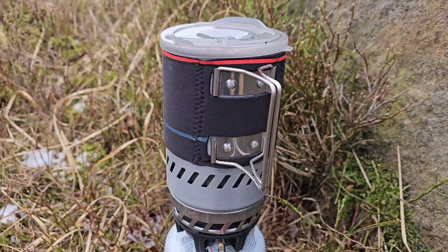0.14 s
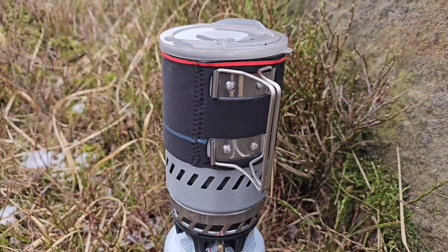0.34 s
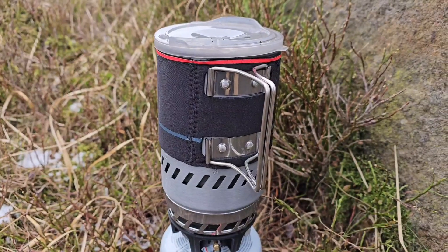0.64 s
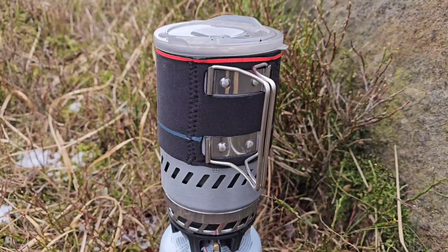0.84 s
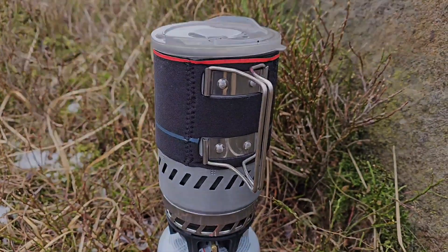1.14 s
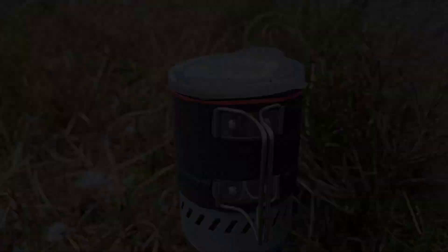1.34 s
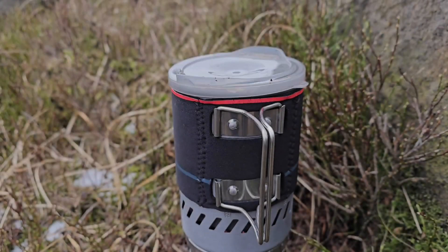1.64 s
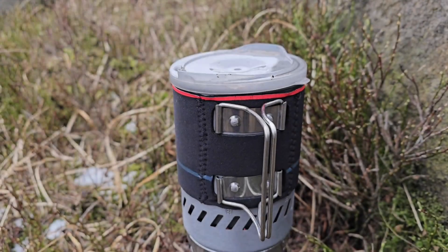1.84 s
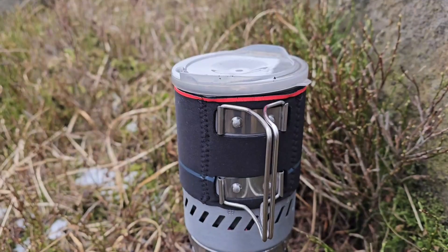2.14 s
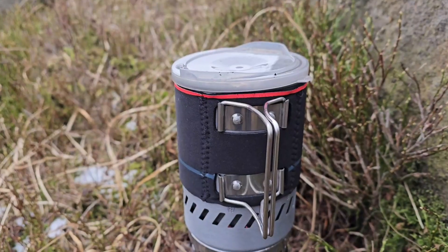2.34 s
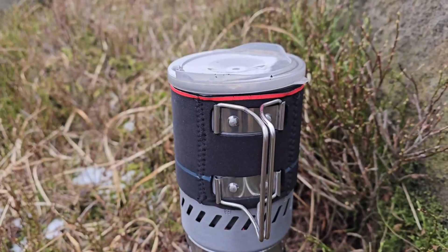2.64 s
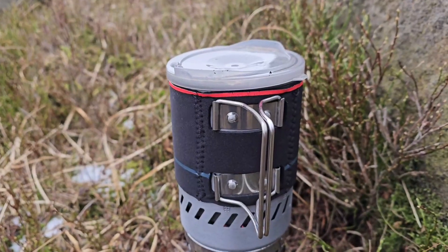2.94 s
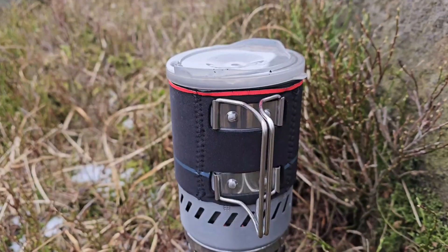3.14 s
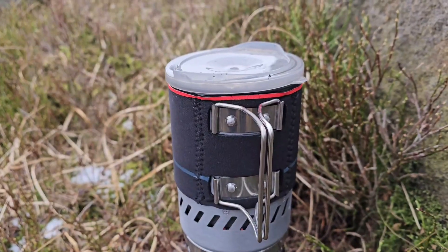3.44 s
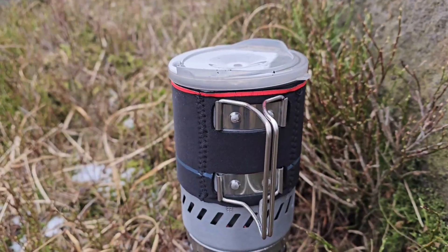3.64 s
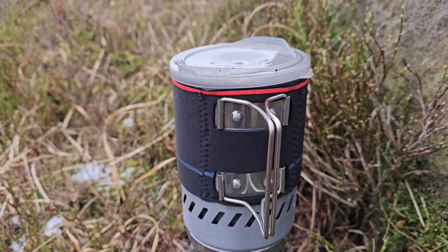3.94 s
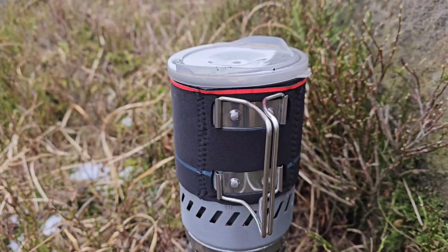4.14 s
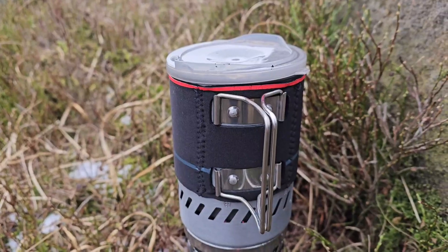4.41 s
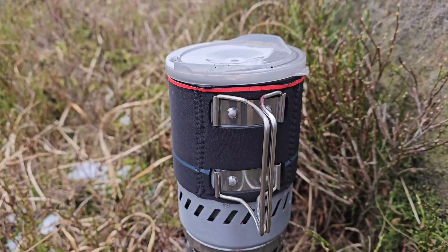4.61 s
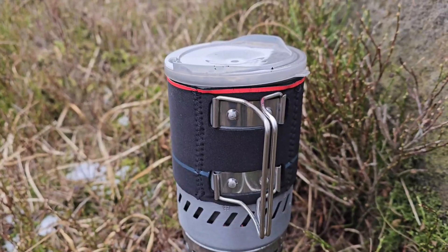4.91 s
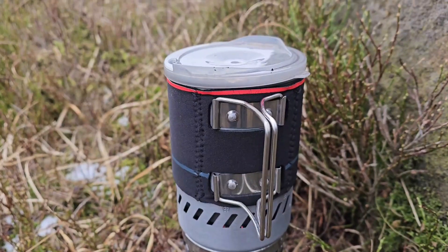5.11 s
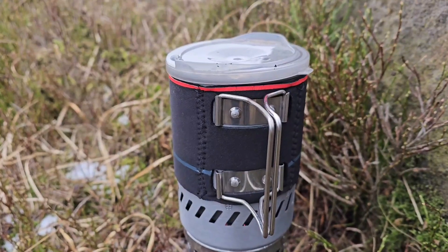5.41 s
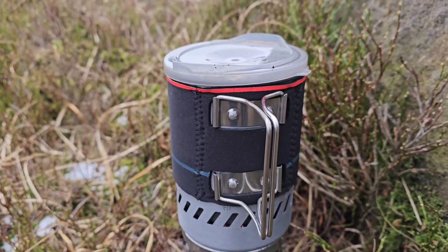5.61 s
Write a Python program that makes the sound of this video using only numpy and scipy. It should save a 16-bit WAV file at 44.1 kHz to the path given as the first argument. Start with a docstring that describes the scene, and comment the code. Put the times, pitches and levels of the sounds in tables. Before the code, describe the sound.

A canister gas stove burns beneath a lidded pot in open, grassy country. From 0 to 1.5 s it is heard a step away: a soft, steady broadband hiss with a hollow, slightly wavering roar near 500 Hz, partly covered by low wind rumble and short pressure thumps on the microphone, the hardest at about 1.2 s. Around 1.55 s the sound cuts to silence for a few hundredths of a second, then returns close up: the hiss is much louder, brighter and grainier, the roar fuller and more tonal, its level and pitch fluttering quickly in the breeze. Wind stays lighter until about 3 s, then buffets in deep, uneven gusts, strongest from roughly 3.5 to 4.8 s, moving between left and right. After 5 s it eases, leaving the burner exposed; a faint bright metal tick comes at 5.36 s and a duller one at 5.46 s. The hiss continues to the end, without echo.

```python
"""A canister gas stove heats a lidded pot on an open hillside, heard a step away, then, after a short break, close up.
The gas jet hisses as shaped broadband noise and excites resonances in the hollows of the burner and the pot's skirt.
The flame roars in the first of these resonances; its level and pitch flutter as the breeze fans it.
Wind on the microphone is low-frequency turbulence with single pressure swings; hot metal ticks as decaying
modes near the end."""
import sys
import numpy as np
from scipy import signal
from scipy.fft import irfft, next_fast_len
from scipy.io import wavfile
from scipy.ndimage import uniform_filter1d

SR = 44100
rng = np.random.default_rng(int(sys.argv[2]) if len(sys.argv) > 2 else 0)


def store_pcm(level_fs):
    """Save levels as 16-bit WAV."""
    pcm = np.round(np.clip(level_fs, -1, 1) * 32767).astype(np.int16)
    wavfile.write(sys.argv[1], SR, np.atleast_2d(pcm).T)


N = 254456
SIZE = 2 * next_fast_len(N // 2, True)
TIME = np.arange(N) / SR
HZ = np.maximum(np.arange(SIZE // 2 + 1) * SR / SIZE, 1)
SIDES = np.array([[1], [-1]])  # left, right


def from_db(db):
    """Amplitude gain is ten to the power of a twentieth of the decibels."""
    return 10 ** (np.asarray(db) / 20)


def in_pitch(rows):
    """Spectral envelopes are interpolated along logarithmic frequency, one per column after the first."""
    hz, *columns = np.transpose(rows)
    return [np.interp(np.log(HZ), np.log(hz), column) for column in columns]


def pan(db):
    """A level difference is split evenly between the sides; positive favours the left."""
    return from_db(SIDES * db / 2)


def white():
    """White noise has independent Gaussian spectral bins of equal power, here 0 dB per Hz."""
    return rng.standard_normal(2 * len(HZ)).view(complex) * np.sqrt(SIZE * SR) / 2


def wave(spectrum):
    """Inverse Fourier synthesis turns a spectrum into samples."""
    return irfft(spectrum, SIZE)[..., :N]


def drift(rate):
    """Twice low-passed noise wanders slowly; its spread is 1 and its rate is the corner in Hz."""
    step = 40  # samples between random draws
    r = np.exp(-2 * np.pi * rate * step / SR)
    draws = rng.standard_normal(2 * N // step)
    slow = signal.lfilter([1], [1, -2 * r, r * r], draws)[-(N // step + 2):]  # settled part
    slow = (slow - slow.mean()) / slow.std()
    return np.interp(np.arange(N) / step, np.arange(len(slow)), slow)


def evened(x, span_s):
    """Division by the short-term rms holds the level near 1, so that only quick lumps remain."""
    power = uniform_filter1d(np.mean(x ** 2, axis=0), max(int(span_s * SR), 3))
    power = uniform_filter1d(power, max(int(span_s * SR / 2), 3))
    return x / np.sqrt(power + 1e-20)


def bumps(rows):
    """Brief level changes in dB add as Gaussian pulses in time."""
    return sum(change_db * np.exp(-((TIME - s) / length_s) ** 2) for s, length_s, change_db in rows)


def gusts():
    """Incoherent addition: the gusts add their power to the breeze; returns rumble and flutter per port in dB."""
    # Each row: start in seconds, hold in seconds, deep rumble in dB and flutter in dB before the
    # growth, left-right difference in dB.
    gust_rows = [(0.065, 0.084, -44.5, -47.5, -5.5), (0.32, 0.26, -48, -45.5, -11),
                 (0.678, .13, -39, -44, -11), (0.932, 0.13, -41.5, -38.5, -4),
                 (1.181, 0.17, -40, -39.5, 3.5), (1.473, 0.073, -49, -42.5, 1),
                 (1.59, 0.072, -51, -40.5, -9.5), (1.715, 0.087, -57, -44, -7),
                 (1.97, 0.13, -45, -46.5, -7), (2.163, 0.11, -57, -45, -10), (2.342, .3, -46, -43, -10.5),
                 (2.70, 0.055, -40.5, -42.5, -11), (3.002, 0.047, -59, -36.5, -4),
                 (3.18, 0.09, -42, -35.5, 0), (3.365, 0.16, -39.5, -39.5, -1),
                 (3.612, 0.094, -33.5, -35, 0), (3.803, .1, -33.5, -37, 0.5), (4.06, 0.23, -55, -41, -3),
                 (4.373, 0.065, -39.5, -36, 0), (4.555, 0.15, -33.5, -34, 0), (4.764, 0.11, -49, -38, -4.5),
                 (5.056, 0.2, -53, -42.5, 0), (5.368, 0.35, -48, -47, -1)]
    breeze_rumble_db, breeze_flutter_db, breeze_pan_db = -47.5, -49.5, -1.5
    attack_s, release_s, growth_db = 0.054, 0.056, 1.0  # growth over the hold
    breeze = from_db([[[breeze_rumble_db]], [[breeze_flutter_db]]]) * pan(breeze_pan_db)
    power = breeze ** 2
    for start, hold_s, rumble_db, flutter_db, pan_db in gust_rows:
        age = TIME - start
        outside = np.maximum(-age, 0) / attack_s + np.maximum(age - hold_s, 0) / release_s
        growth = from_db(growth_db * (np.clip(age / hold_s, 0, 1) - 1.5))
        swell = np.exp(-np.minimum(outside, 10) ** 2) * growth
        power = power + (from_db([[[rumble_db]], [[flutter_db]]]) * pan(pan_db) * swell) ** 2
    return 10 * np.log10(power)


def lulls():
    """Amplitude modulation: the gain of the wind mostly sinks, once rises, for a moment."""
    # Each row: centre in seconds, length in seconds, change in dB.
    lull_rows = [(0.863, 0.02, 3), (1.09, .02, -2.5), (1.428, .025, -3.5), (1.872, .042, -4),
                 (3.156, .02, -1.5), (4.02, 0.028, -1.5), (4.994, .025, -1)]
    return from_db(bumps(lull_rows))


def turbulence(colour, own_db, lumpy_db):
    """Partial coherence: pressure noise shared by both ports, plus lumps on each port alone; rms near 1."""
    gain = from_db(in_pitch(colour)[0])
    shared = wave(white() * gain)
    own = [wave(white() * gain) * from_db(own_db + lumpy_db * drift(rate=9.9)) for port in SIDES]
    return evened(shared + np.array(own), span_s=0.44)


def eddies(cycles):
    """A convected eddy swings the pressure to and fro a couple of times, at one port before the other."""
    # Each row: time in seconds, peak in dB, swing in Hz, left-right difference in dB, left lead in radians.
    eddy_rows = [(0.012, -30.5, 72, -1, -1), (0.686, -32, 65.5, 0, -1.5), (0.734, -31.5, 80, -7, 1),
                 (0.791, -36, 86, -1, -1.5), (1.052, -33, 130, 1, .2), (1.127, -30.5, 62, 2, 0.5),
                 (1.188, -18.5, 111, -4, 1.5), (1.242, -28, 186, 3, -0.5), (1.324, -26.5, 149, -10, 2),
                 (1.584, -29.5, 60, -9, 1), (1.606, -29, 200, -6, 1), (1.953, -38, 60, -4, 0),
                 (2.05, -32, 48, 0, 0), (2.26, -29.5, 109, -7, 0), (2.44, -27.5, 178, -7, 0.7),
                 (2.736, -28.5, 62.5, -9, 0.9), (3.042, -33, 159, -2, -0.5), (3.285, -29, 80, 6, -1),
                 (3.41, -35, 89, 0, 3.5), (3.562, -25, 62, 3, 0.4), (3.624, -25, 71.6, 6, -1),
                 (3.657, -34, 93, 6, 0), (3.706, -34, 127, 3, -7), (3.798, -26, 95, 4, -1),
                 (3.883, -24.5, 70.5, 4, 0.8), (3.918, -27, 100, 0, 2), (4.207, -33, 106, -5, 0.5),
                 (4.446, -24.5, 165, 2, 0.13), (4.509, -24.5, 61, 9, 1), (4.597, -24.5, 78, 7, 0.2),
                 (4.653, -35, 108, 3, 0.4), (4.718, -24, 132, 12, 0.7), (4.739, -26.5, 80, 9, 1.5),
                 (5.043, -36, 70, 0, 0)]
    out = np.zeros((2, N))
    for (s, peak_db, hz, pan_db, lead), turn in zip(eddy_rows, rng.random(len(eddy_rows))):
        near = np.abs(TIME - s) < .1
        age = (TIME[near] - s) * hz  # in cycles
        swing = np.exp(-(age / cycles) ** 2) * np.cos(2 * np.pi * (age + turn) + SIDES * lead / 2)
        out[:, near] += from_db(peak_db) * pan(pan_db) * swing
    return out


def wind(rumble_db, flutter_db):
    """Eddy size sets frequency: large ones rumble, small ones flutter, the strongest thump on their own."""
    # Colours before levelling. Each row: frequency in Hz, relative level in dB per Hz.
    rumble_colour = [(14, -38), (23, -11), (33, 0.5), (58, 0), (85, -2), (120, -6.5), (160, -10.5),
                     (300, -72)]
    flutter_colour = [(90, -6.5), (135, 1), (170, 2.5), (215, 0.5), (262, 1), (315, -11), (370, -8.5),
                      (430, -18.5), (600, -16.5), (1500, -58.5)]
    rumble = from_db(rumble_db) * turbulence(rumble_colour, own_db=-7.5, lumpy_db=4.0)
    flutter = from_db(flutter_db) * turbulence(flutter_colour, own_db=-14.5, lumpy_db=8.0)
    steady = rumble * pan(db=1.5) + flutter * pan(db=0.0)
    return lulls() * steady + eddies(cycles=0.69)


def ticks():
    """Modal ringing: expanding metal slips and its modes decay exponentially; a soft slip stirs only low modes."""
    # Hot metal slips. Each row: time in seconds, strength in dB, brightness limit in Hz.
    slips = [(5.3592, -26.5, 14000), (5.4606, -11, 1300)]
    # Modes of the metal. Each row: frequency in Hz, relative level in dB, 60 dB decay time in seconds.
    metal = [(1330, -21, .02), (2130, -9, .04), (2820, -2.5, .012), (3550, -0.5, .014), (3090, -13, .03),
             (4160, -21, .025), (11400, -17, .01), (12700, -21, .008)]
    out = np.zeros(N)
    for s, strength_db, top_hz in slips:
        near = (TIME > s) & (TIME < s + .1)
        age = TIME[near] - s
        for k, (hz, level_db, t60) in enumerate(metal):
            height = (-1) ** k * from_db(strength_db + level_db) / (1 + (hz / top_hz) ** 8)
            decay = np.exp(-np.log(1000) * age / t60)
            out[near] += height * decay * np.sin(2 * np.pi * hz * age)
    return out * pan(db=-6.0)


def flame(flutter_db):
    """Modulation by airflow: flame strength in dB follows the wind, and now and then flares or falters."""
    # Each row: centre in seconds, length in seconds, change in dB.
    flares = [(0.1, 0.16, -7), (0.41, 0.096, 3.5), (1.67, 0.046, 1), (1.817, 0.027, 6), (2.06, 0.034, -4.5),
              (2.16, 0.02, 6), (2.479, 0.013, 9), (2.583, 0.046, 4.5), (2.71, 0.018, -4),
              (2.942, 0.014, -1.5), (3.195, 0.037, 2.5), (3.774, 0.02, 7), (3.94, 0.032, -5.5),
              (4.952, 0.026, -8.5), (5.298, 0.31, -1.5), (5.68, 0.058, -3)]
    fanning, usual_flutter_db = 0.19, -36.5  # dB of flame per dB of flutter above usual
    fanned = fanning * (flutter_db.mean(axis=0) - usual_flutter_db)
    return fanned + bumps(flares)


def hollow(hz, width_hz, level_db, pan_db, lead):
    """Resonance: turbulence rings in a hollow and reaches each port with its own level and phase."""
    shape = 1 / (1 + 2j * (HZ - hz) / width_hz) ** 2
    ports = from_db(level_db) * pan(pan_db) * np.exp(.5j * SIDES * lead)
    return white() * shape * ports


def wavering(x, cents):
    """Frequency modulation by uneven playback speed, at an average speed of 1."""
    speed = 2 ** (cents / 1200)
    place = np.cumsum(speed / speed.mean())
    return np.array([np.interp(place, np.arange(N), port) for port in x])


def wandering(spectrum, count=16):
    """Independent amplitude modulation of overlapping bands makes the colour of the noise wander."""
    wander_db, wander_hz = .65, 2.5  # slow
    flicker_db, flicker_hz = 1.15, 22  # quick
    centres = np.geomspace(1700, 14000, count)
    out = 0
    for band in np.eye(count):
        level_db = wander_db * drift(rate=wander_hz) + flicker_db * drift(rate=flicker_hz)
        out = out + wave(spectrum * np.interp(HZ, centres, band)) * from_db(level_db)
    return out


def stove(jet, modes, flame_db, roar_db, ring_db, hiss_db, sway, shimmer_db, restless_db):
    """Turbulent excitation: the jet hisses; the flame drives and bends the first mode, and stirs six more."""
    # Level as the microphone shifts a little.
    # Each row: time in seconds, bright hiss in dB, hollow midrange in dB.
    hiss_level = [(0.0, 0.4, -0.5), (1.6, -0.3, 0.5), (2.0, 1, -0.8), (2.5, 0.6, -0.5), (2.8, 0.4, 0),
                  (3.5, 0.45, 1.8), (4.2, 0.4, 1), (5.0, -0.5, 1), (5.77, 0.5, 1)]
    # The pitch wavers with the heat in the burner.
    waver_cents, waver_hz, sharpen_cents_per_db = 17.96, 7, 1.16
    hollows = [hollow(*mode) for mode in modes]
    upper = sum(hollows[7:])
    middle = sum(wave(ring) * from_db(restless_db * drift(rate=12)) for ring in hollows[1:7])

    cents = waver_cents * drift(rate=waver_hz) + sharpen_cents_per_db * flame_db
    main = wavering(wave(hollows[0]), cents)
    roar = evened(main, span_s=0.073) * main.std() * from_db(roar_db + flame_db)

    times, *levels = np.transpose(hiss_level)
    level_db, hollow_db = [np.interp(TIME, times, column) for column in levels]
    rings = middle * from_db(ring_db + hollow_db + sway * flame_db)

    jet_db, jet_pan_db = in_pitch(jet)
    diffuse = np.array([white(), white()]) * from_db(jet_db + hiss_db) * pan(jet_pan_db)
    hiss = wandering(upper + diffuse)
    return roar + rings + hiss * from_db(level_db + shimmer_db * drift(rate=19))


def scene():
    """Superposition: far position, a moment of silence, then the near one; the same wind blows over both."""
    # Diffuse jet hiss. Each row: frequency in Hz, dB per Hz before trims, left-right difference in dB.
    far_jet = [(370, -85.5, -13), (696, -94.5, 12), (1020, -89.5, 7.5), (2000, -102, -5), (2800, -102, 2),
               (4250, -100, -4), (6000, -96, 1), (7860, -103.7, -7), (9700, -105.4, 5),
               (10300, -117.0, -2.5), (11400, -109.1, -9), (13000, -110.9, -5), (15200, -111.6, -12)]
    near_jet = [(400, -82.5, 3), (720, -87, -12), (1000, -89, 4), (1750, -88, -2), (1960, -89, 9.5),
                (2210, -87, -1), (2770, -81.5, 1.5), (4000, -83.5, 4), (6000, -87, -10.5),
                (7800, -88.5, -7), (9500, -89, -3.5), (10470, -99.8, 8), (11300, -95.5, -3.5),
                (13200, -100.8, -9), (15200, -101.1, -15)]
    # Resonances of burner and skirt. Each row: frequency in Hz, width in Hz of each of two cascaded
    # poles, peak in dB per Hz before trims, left-right difference in dB, left lead in radians.
    far_modes = [(503, 124, -76, -5, 0.84), (344, 72, -83, 6, 1), (747, 330, -84, 0, 1.3),
                 (1274, 370, -86, -2, -0.5), (1585, 500, -87, 3, 0.5), (1900, 87, -80.5, -1, 2.1),
                 (2224, 360, -88.5, 8.5, 1.5), (2515, 120, -86, 5, 1.5), (3150, 270, -91.5, 1, 1),
                 (3400, 300, -90, 2, 0.7), (3650, 280, -95.5, -8, 0.5), (4660, 370, -88, -3, -2.5),
                 (4920, 330, -92, 7, 1.5), (5100, 210, -99, -7, 8), (5360, 180, -93.5, -15, 0),
                 (6790, 650, -95, 6, 2), (7060, 420, -103.5, 1, 3), (7300, 240, -101, -11, 0),
                 (8700, 210, -105.3, 4, 4)]
    near_modes = [(490.3, 75, -61.5, -3, 0.5), (746, 244, -80.5, 2, 1.68), (1193, 390, -82, 2.5, 0.87),
                  (1533, 275, -81, 1.5, 0.5), (1680, 176, -78.5, -0.1, 1.22), (2110, 240, -83, -3.5, 4),
                  (2350, 250, -84, 2.5, 1.5), (3077, 200, -78.5, 4, 1.5), (3304, 99, -81, -8, -2.5),
                  (3620, 220, -86, -2, -8), (4093, 320, -82, -13, 1.3), (4395, 88, -79.5, -15, 1),
                  (4660, 430, -80.5, -12, 3.5), (4830, 36, -75, 5.5, 4), (5350, 700, -78, 2.5, 1.63),
                  (5750, 73, -78, -2, 2), (6050, 330, -80.5, 3, 3), (6345, 220, -81, 13.5, -2.5),
                  (6575, 114, -81, -1, -0.5), (6960, 480, -84.5, 14, 1), (7280, 150, -88, 14, -3.5),
                  (8110, 260, -83.5, 2, 2), (8820, 450, -90, 2, -1)]
    far_end_s, near_start_s, fade_s = 1.527, 1.573, .014
    rumble_db, flutter_db = gusts()
    flame_db = flame(flutter_db)
    far = stove(far_jet, far_modes, flame_db, roar_db=-0.5, ring_db=0, hiss_db=-0.7,
                sway=0.095, shimmer_db=0.5, restless_db=1.5)
    near = stove(near_jet, near_modes, flame_db, roar_db=0, ring_db=0.43, hiss_db=-1.38,
                 sway=0.26, shimmer_db=0.36, restless_db=1.36)
    air = wind(rumble_db, flutter_db)
    before = np.clip((far_end_s - TIME) / fade_s, 0, 1)
    after = np.clip((TIME - near_start_s) / fade_s, 0, 1)
    return before * (far + air) + after * (near + air + ticks())


def record(dry):
    """Band limitation: a steep elliptic low-pass removes the top."""
    cutoff_hz = 15550
    lowpass = signal.ellip(12, .1, 80, cutoff_hz, fs=SR, output="sos")  # ripple, rejection in dB
    return signal.sosfilt(lowpass, dry)


dry = scene()
out = record(dry)
store_pcm(out)
```